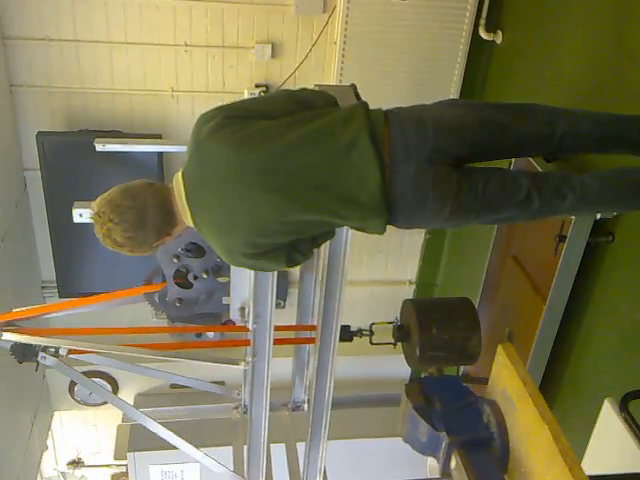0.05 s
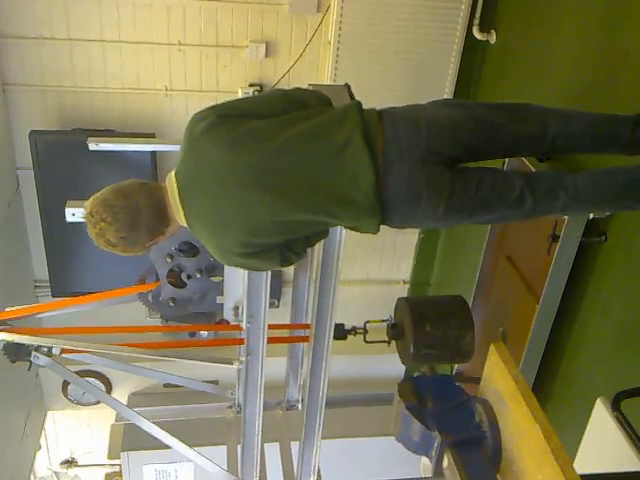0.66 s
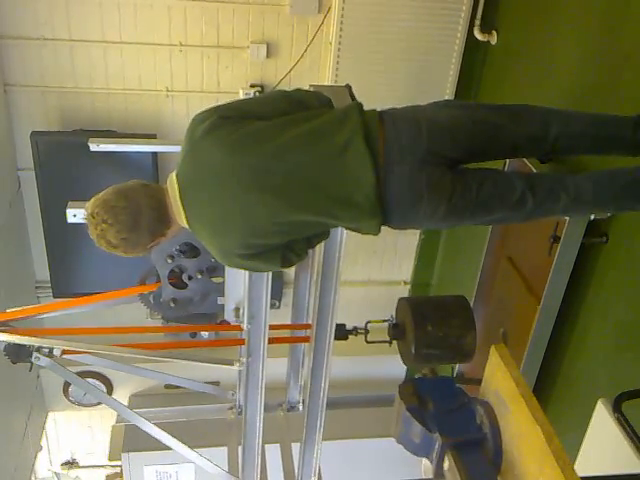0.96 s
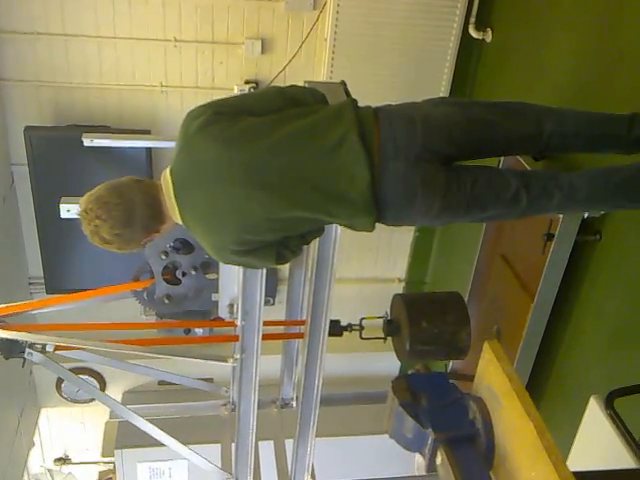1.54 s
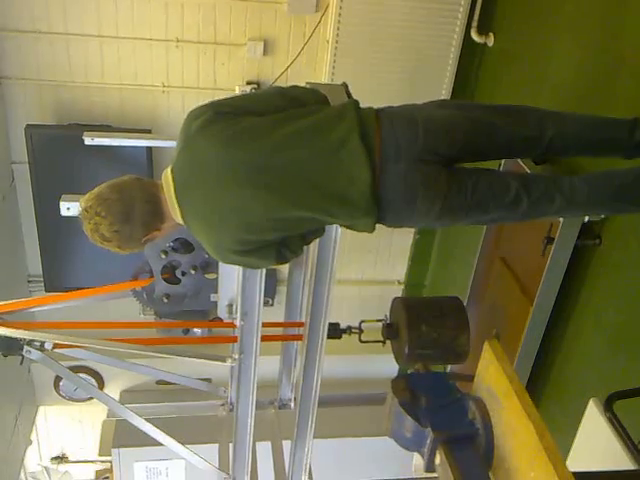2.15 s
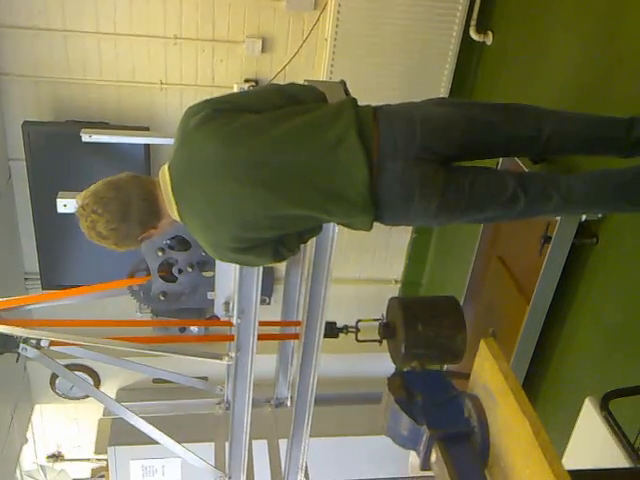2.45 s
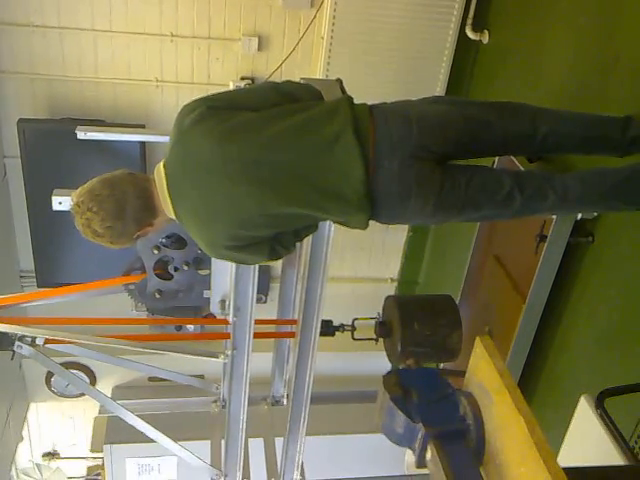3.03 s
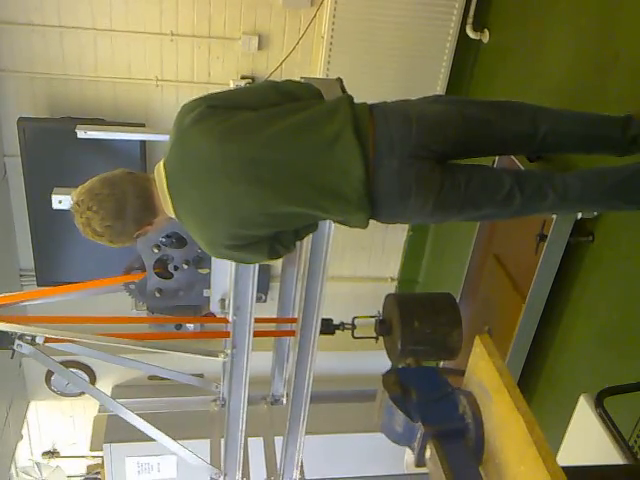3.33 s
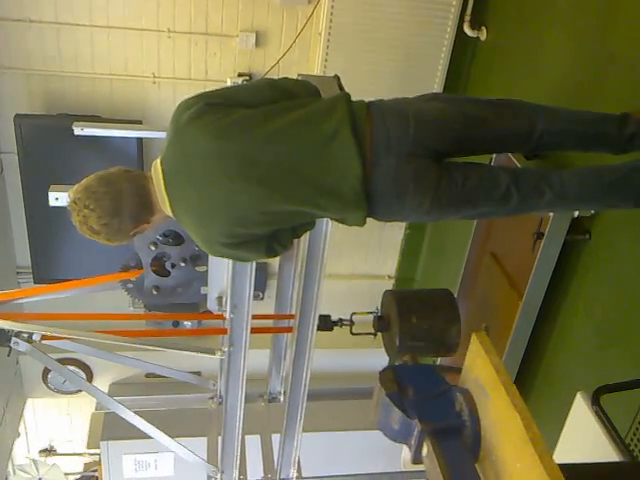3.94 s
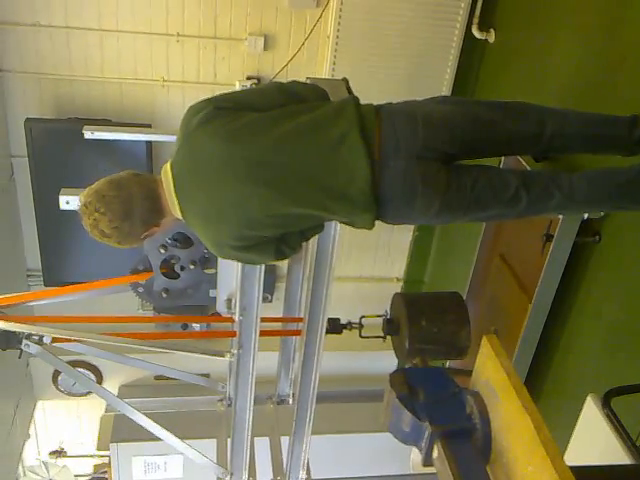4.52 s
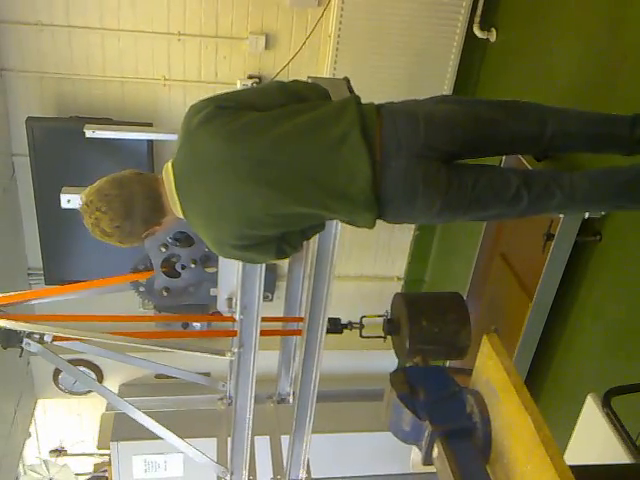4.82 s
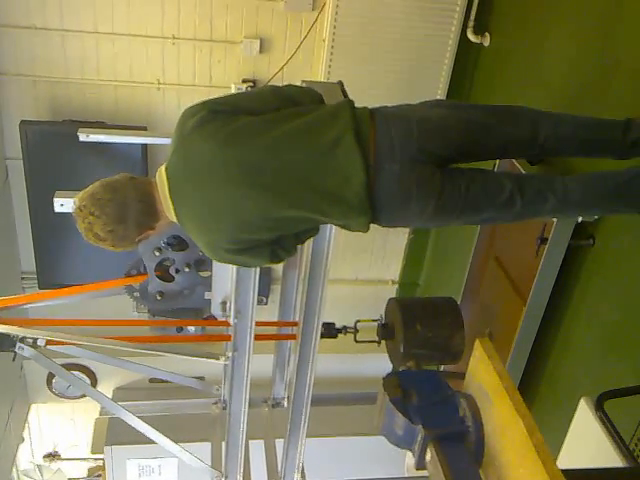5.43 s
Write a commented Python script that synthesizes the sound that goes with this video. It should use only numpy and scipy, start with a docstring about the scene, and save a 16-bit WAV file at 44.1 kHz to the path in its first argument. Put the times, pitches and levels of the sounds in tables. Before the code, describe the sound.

Quiet metal friction, tiny creaks and a faint drone come from a winch under load, with a soft bump early on. After about two seconds its bearing starts squealing in brief, very high chirps, some clean and some rough. They pause for a second, return in a slightly weaker group and die away. A small mono microphone catches the bright ring of the workshop walls, and the background noise rises and sinks with the squeals.

```python
"""Squealing winch in a workshop

A winch lifts a heavy weight on a metal rig. Its dry bearing sticks and slips in short squeals near
6 kHz, hopping between neighbouring modes, and the hard walls ring after it. Underneath are the rubbing
of the loaded frame, small creaks, the drive's drone, a thin whistle, mains hum, hiss and one soft bump.
An expander lifts all of it with each burst and lets it sink again."""
import sys
import numpy as np
from scipy import signal
from scipy.fft import rfft, irfft, next_fast_len
from scipy.io import wavfile
from scipy.ndimage import uniform_filter1d

SR = 44100
rng = np.random.default_rng(int(sys.argv[2]) if len(sys.argv) > 2 else 0)


def unload_audio(sound):
    """Save the sound as a 16-bit wav file, at the path given as the first command line argument."""
    columns = np.transpose(np.atleast_2d(sound))
    # keep every value between -1 and 1, then stretch to whole-number steps
    steps = np.round(np.clip(columns, -1, 1) * 32767)
    wavfile.write(sys.argv[1], SR, steps.astype(np.int16))


N = 245637
TIME = np.arange(N) / SR
LEAD_S, LEAD_DB = 0.01, -15.5  # each squeal sounds faintly before it catches

# effort on the winch, riding the rubbing and the creaks: (time [s], level [dB])
EFFORT = [(0, -45.5), (.25, -50), (1.08, -55), (1.26, -51), (2.0, -50), (2.25, -46), (2.7, -46.5),
          (3.4, -45.5), (3.82, -47), (3.87, -44.5), (4.25, -48), (4.45, -45.5), (5.57, -46.5)]


def amp(db):
    """Decibels to gain."""
    return 10 ** (np.asarray(db) / 20)


def unit(x):
    """Scales to rms 1."""
    return x / np.sqrt(np.mean(abs(x) ** 2) + 1e-20)


def follow(curve):
    """A level curve as a gain for every sample."""
    return amp(np.interp(TIME, *np.transpose(curve)))


def read(points, hz):
    """Reads a curve on a log-frequency axis."""
    f, value = np.transpose(points)
    return np.interp(np.log(hz + 1), np.log(f), value)


def add(mix, start_s, sound):
    """Mixes a sound in at its start time."""
    part = mix[max(round(start_s * SR), 0):][:len(sound)]
    part += sound[:len(part)]


def noise(gain, band=(0, SR)):
    """Noise with the given gain per frequency, scaled to rms 1 within a band."""
    size = next_fast_len(N)
    hz = np.fft.rfftfreq(size, 1 / SR)
    spectrum = rfft(rng.standard_normal(size)) * gain(hz)
    inside = (hz > band[0]) & (hz < band[1])
    return unit(irfft(spectrum, size)[:N]) * np.linalg.norm(spectrum) / np.linalg.norm(spectrum[inside])


def flutter(t, rate_hz, count=40):
    """Complex random wobble of rms about 1, its rates spread around zero."""
    rates, phases = rng.standard_normal(count) * rate_hz, rng.random(count)
    return np.exp(2j * np.pi * (np.outer(t, rates) + phases)).sum(1) / np.sqrt(count)


def wavering(hz, share, rate_hz=7):
    """A tone of rms 1 whose strength and phase drift slowly."""
    coarse = TIME[::256]
    drift = unit(np.sqrt(1 - share ** 2) + share * flutter(coarse, rate_hz))
    carrier = np.exp(2j * np.pi * (hz * TIME + rng.random()))
    return np.sqrt(2) * (np.interp(TIME, coarse, drift) * carrier).real


def ringing(modes, hz):
    """Gain of a set of resonances standing out of a flat spectrum."""
    peaks = sum((amp(db) ** 2 - 1) / (1 + (2 * (hz - f) / width) ** 2) for f, width, db in modes)
    return np.sqrt(abs(1 + peaks))


def squeal(length, db, first_hz, last_hz, rough, rise_s=0.0042, fall_s=0.0076, wander_hz=95):
    """Stick and slip lock onto one bearing mode; uneven grip makes it start slowly, chatter and wander."""
    t = np.arange(int((LEAD_S + length + 4 * fall_s) * SR)) / SR - LEAD_S
    glide = np.interp(t, [0, length], [first_hz, last_hz])
    hz = glide + rough * wander_hz * flutter(t, rate_hz=108.6).real
    grip = np.sqrt(1 - rough ** 2) + rough * flutter(t, rate_hz=170)
    tone = unit(grip) * np.exp(2j * np.pi * np.cumsum(hz) / SR)
    lead = amp(LEAD_DB) * np.minimum((t + LEAD_S) / rise_s, 1)
    attack = np.sin(np.pi / 2 * np.clip(t / (rise_s + 0.19 * rough * length), 0, 1)) ** 2
    release = np.exp(-np.maximum(t - length + fall_s, 0) / fall_s)
    envelope = np.maximum(lead, attack) * release
    # the lopsided slip adds an octave, strongest in a clean lock on the top mode at 6284 Hz
    on_top_mode = np.exp(-((first_hz - 6284) / 310) ** 2)
    octave_db = -30.5 + 7.5 * rough + 20.5 * on_top_mode * (1 - rough)
    octave = amp(octave_db) * unit(tone ** 2)
    return np.sqrt(2) * amp(db) * envelope * (tone + octave).real


def creaks(count=60, per_s=9, pitch_hz=4838, spread_hz=70):
    """Tiny rough squeals of the bearing at random moments, stronger with effort."""
    out = np.zeros(N)
    times = np.cumsum(rng.uniform(0, 2, count)) / per_s
    for start_s, (size, first, last) in zip(times, rng.standard_normal((count, 3))):
        first_hz, last_hz = pitch_hz + spread_hz * first, pitch_hz + spread_hz * last
        add(out, start_s, squeal(0.03, -9.5 + 2.5 * size, first_hz, last_hz, rough=0.98))
    return follow(EFFORT) * out


def bearing(scrape_db=-21):
    """The dry bearing: squeals and creaks with scraping noise riding on them, coloured by its modes."""
    # squeal cues: (time [s], length [s], level [dB], first pitch [Hz], last pitch [Hz], roughness [0-1])
    squeals = [ (0.002, 0.064, -53, 5430, 5335, 0.47), (0.234, 0.027, -39, 4881, 4840, 0.2),
               (0.293, 0.043, -40.5, 4940, 5060, 0.22), (2.151, 0.026, -26.5, 6120, 5730, 0.68),
               (2.561, 0.066, -23, 5746, 5687, 0.28), (2.619, 0.074, -25.5, 5652, 5540, 0.57),
               (2.646, 0.0318, -42.5, 5900, 6196, .25), (2.736, 0.029, -23, 5420, 5560, 0.26),
               (2.921, 0.033, -35, 5667, 5713, 0.37), (3.106, 0.041, -21, 6130, 6126, 0.16),
               (3.138, 0.021, -21, 6000, 5890, 0.31), (3.192, 0.035, -38.5, 10870, 10530, 0.54),
               (3.213, 0.0192, -36.5, 4810, 4440, .33), (3.214, 0.12, -31.5, 5834, 5800, 0.28),
               (3.232, 0.035, -25, 5655, 5582, 0.8), (3.342, .042, -39, 10740, 10470, .2),
               (3.363, 0.029, -28.5, 5814, 5627, 0.8), (3.364, 0.012, -37.5, 4690, 4610, 0.54),
               (4.333, 0.092, -27, 5570, 5670, 0.53), (4.39, 0.15, -32, 5980, 5890, 0.78),
               (4.45, 0.017, -20.5, 5956, 5850, 0.12), (4.511, 0.054, -34, 4871, 4834, 0.31),
               (4.765, 0.075, -26.5, 5850, 5886, 0.4), (4.842, 0.017, -26, 5580, 5377, 0.6),
               (4.857, 0.13, -28.5, 6095, 5940, 0.62), (4.929, 0.054, -25.5, 6183, 6074, 0.37),
               (5.525, 0.023, -38, 10620, 10200, 0.27), ]
    # what the bearing radiates, with a sharp drop above 6 kHz: (frequency [Hz], gain [dB])
    radiation = [(3000, -1.5), (4500, 0.5), (6170, -2), (6330, -18), (6560, -8.5), (6780, -2),
                 (7100, -28.5), (9300, -6.5), (10300, 0.5), (12400, -2), (15500, -16.5)]
    # the skirt of scrape around the squeals: (frequency [Hz], gain [dB])
    skirt = [(2000, -32), (4200, -13), (5200, -0.5), (6100, 5), (6800, -3), (7300, -31), (16000, -31.5)]
    tones = creaks()
    for start_s, *shape in squeals:
        add(tones, start_s - LEAD_S, squeal(*shape))
    envelope = np.sqrt(abs(uniform_filter1d(tones ** 2, size=300)))
    scrape = amp(scrape_db) * envelope * noise(lambda hz: amp(read(skirt, hz)))
    colour = amp(read(radiation, np.fft.rfftfreq(N, 1 / SR)))
    return irfft(rfft(tones + scrape) * colour, N)


def workshop(x, early_db=-7, early_t60=0.088, tail_db=-13.5, build_up_s=0.028):
    """Quick reflections off the rig and the near wall, then a long, bright tail."""
    # the ring of the hard walls: (frequency [Hz], time to fall 60 dB [s])
    ring = [(500, 0.22), (5000, 0.76), (6500, 0.536), (11000, 0.27), (16000, 0.14)]
    t = np.arange(SR) / SR
    taps = rng.standard_normal(SR) * (rng.random(SR) < 0.06) * (t > 0.003)
    early = taps * amp(-60 * t / early_t60)
    wash = rng.standard_normal(SR) * np.minimum(t / build_up_s, 1)
    hz, when, bands = signal.stft(wash, SR, nperseg=256)
    decay = amp(-60 * when / read(ring, hz)[:, None])
    tail = signal.istft(bands * decay, SR, nperseg=256)[1][:SR]
    near = signal.fftconvolve(x, early / np.linalg.norm(early))[:N]
    far = signal.fftconvolve(x, tail / np.linalg.norm(tail))[:N]
    return x + amp(early_db) * near + amp(tail_db) * far


def rubbing(friction_db=-1.5):
    """Friction noise coloured by the resonances of the loaded frame, the sharpest of which sing."""
    # broad colour of the friction: (frequency [Hz], gain [dB])
    colour = [(100, -23), (170, -18), (370, -8.5), (440, -13.5), (560, -5), (850, -5.5), (1010, -8.5),
              (1250, -7), (1380, -12), (2200, -15), (3800, -18.5), (4700, -17.5), (5700, -21.5),
              (7000, -41)]
    # the frame's broader resonances: (frequency [Hz], width [Hz], boost [dB])
    frame = [(150, 30, 5), (625, 20, 4), (735, 25, 4), (770, 14, 4), (810, 22, 3), (890, 18, 3),
             (1106, 16, 4), (1146, 12, 5), (1215, 25, 4), (1332, 12, 5), (1510, 30, 5), (1578, 22, 8),
             (1755, 22, 5), (2378, 26, 8), (4750, 110, 3)]
    # its sharpest modes: (pitch [Hz], relative level [dB], wavering share [0-1])
    singing = [(479.5, -16.5, 1), (806.4, -16.5, 0.3), (888.6, -10.5, 1), (925.1, -12.5, 0.9),
               (1094, -14, 0.4), (1299, -15.5, 0.52), (1695.4, -18, 1)]
    friction = noise(lambda hz: amp(read(colour, hz)) * ringing(frame, hz), band=(400, 4000))
    tones = sum(amp(db) * wavering(hz, share) for hz, db, share in singing)
    return follow(EFFORT) * (amp(friction_db) * friction + tones)


def mains_hum():
    """A steady low hum from the mains."""
    # hum partials: (pitch [Hz], relative level [dB])
    partials = [(100, 5), (200, -5)]
    return sum(np.sqrt(2) * amp(db) * np.sin(2 * np.pi * (hz * TIME + rng.random()))
               for hz, db in partials)


def drone():
    """The drive drones, growing as the load is taken up, then dropping back."""
    # the drive's tones: (pitch [Hz], relative level [dB], wavering share [0-1])
    tones = [(515.3, -1, 0), (629.7, 8, 0.9), (688.4, -1, 0.92), (809, 2.5, 1)]
    # strain on the drive: (time [s], gain [dB])
    strain = [(0, -1), (1.0, -4.5), (2.0, 3), (2.7, 5.5), (3.3, 6.5), (3.8, -10), (4.4, -4), (5.57, -14)]
    return follow(strain) * sum(amp(db) * wavering(hz, share) for hz, db, share in tones)


def whistle(pitch_hz=5184):
    """A thin, wavering whistle that swells and fades."""
    # whistle swells: (peak time [s], half length [s], relative level [dB])
    swells = [(0, 0.19, 4.5), (1.697, .4, -2), (2.354, 0.17, 12), (3.92, 0.25, 8.5), (5.3, 0.6, 4.5)]
    envelope = sum(amp(db) * np.exp(-((TIME - peak_s) / half) ** 2) for peak_s, half, db in swells)
    return envelope * wavering(pitch_hz, share=0.51, rate_hz=11)


def hiss():
    """Steady room noise, full in the low mids and hissy on top."""
    # colour of the room tone: (frequency [Hz], gain [dB])
    air = [(20, -13), (45, 10), (80, 14.5), (160, 20), (350, 15), (800, 10.5), (2000, 4.5), (4000, 3.5),
           (7500, 0.5), (11000, 2), (15500, 5)]
    return noise(lambda hz: amp(read(air, hz)), band=(13000, 15000))


def bump(db=-52.5, peak_s=1.11, half_length_s=0.055, pitch_hz=175, width_hz=25):
    """A soft, dull bump as the load is taken up."""
    body = noise(lambda hz: np.exp(-((hz - pitch_hz) / width_hz) ** 2))
    return amp(db) * np.exp(-((TIME - peak_s) / half_length_s) ** 2) * body


def expander(x, unity_db=-44.5, db_per_db=0.59, attack_s=0.012, release_db_per_s=62, max_gain_db=12.5):
    """The gain jumps up when the sound gets loud and sinks back slowly."""
    pole = np.exp(-1 / (attack_s * SR))
    level_db = 10 * np.log10(signal.lfilter([1 - pole], [1, -pole], x ** 2) + 1e-12)
    sink_db = release_db_per_s * TIME
    held_db = np.maximum.accumulate(level_db + sink_db, axis=-1) - sink_db
    return x * amp(np.minimum(db_per_db * (held_db - unity_db), max_gain_db))


def scene(bed_db=-65):
    """The bearing rings in the workshop, over the rubbing frame and a quiet bed of tones and hiss."""
    winch = workshop(bearing()) + rubbing()
    bed = amp(bed_db) * (mains_hum() + drone() + whistle() + hiss())
    return (winch + bed + bump())[None]


def record(dry, cut_off_hz=15900):
    """A small mono microphone with an expander, a drifting level and a steep band limit."""
    # slow drift of the overall level: (time [s], gain [dB])
    drift = [(0, 0.5), (.3, -5.5), (.68, -8), (1.22, 1.5), (2.1, 0.5), (3.2, -2.5), (3.75, -5),
             (4.45, -7.5), (4.85, -9), (5.57, -11.5)]
    low_pass = signal.firwin(511, cut_off_hz, window=("kaiser", 9), fs=SR)
    return signal.oaconvolve(follow(drift) * expander(dry), low_pass[None], "same")


dry = scene()
out = record(dry)
unload_audio(out)
```